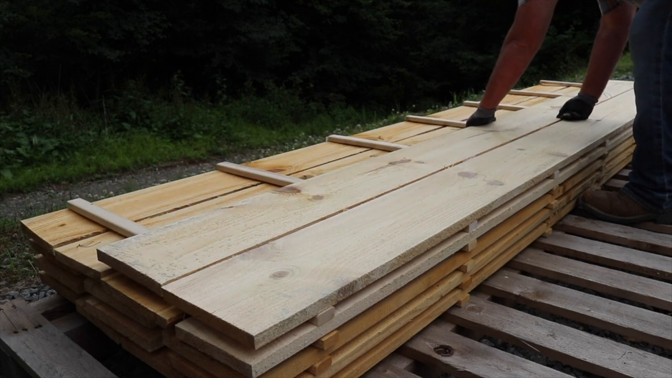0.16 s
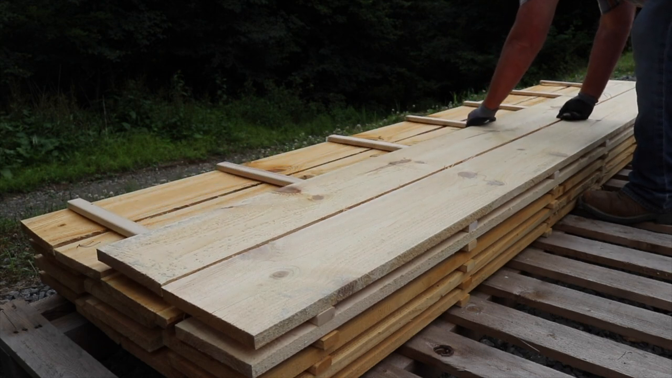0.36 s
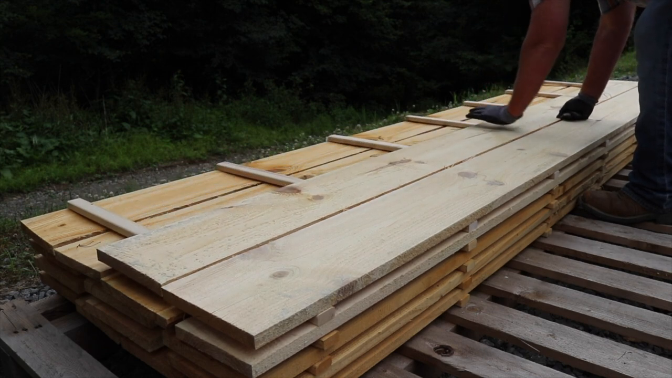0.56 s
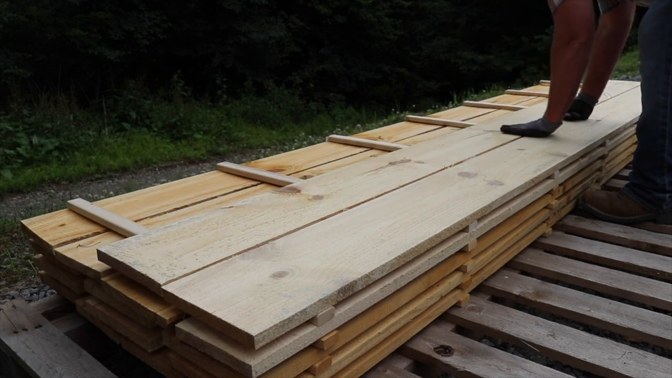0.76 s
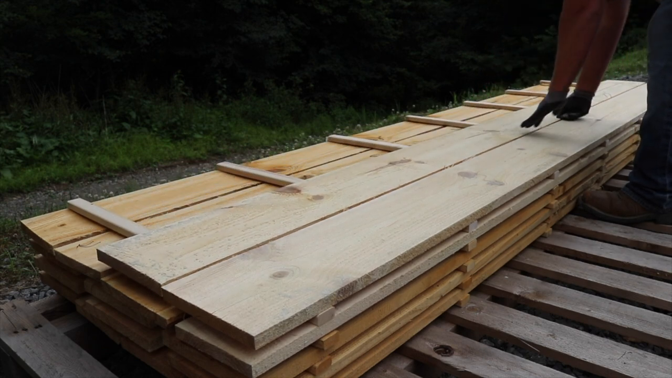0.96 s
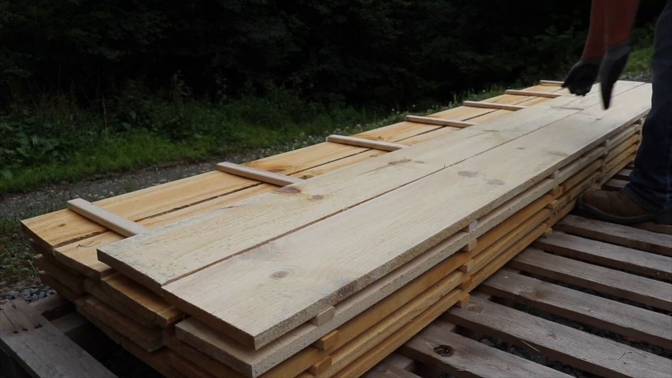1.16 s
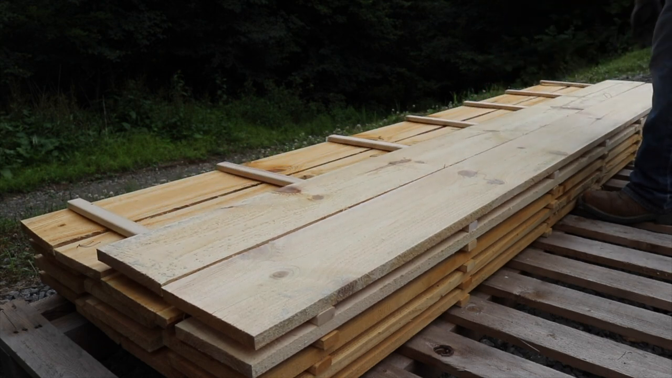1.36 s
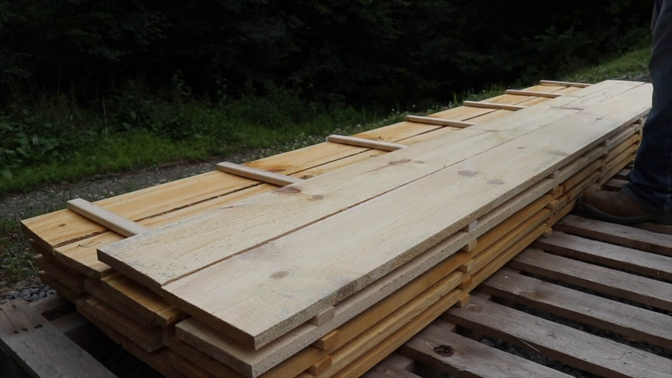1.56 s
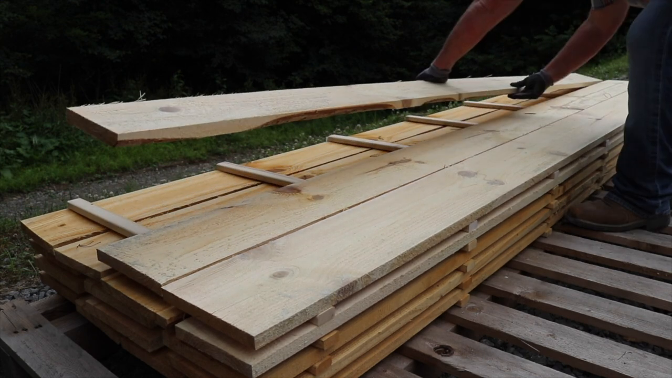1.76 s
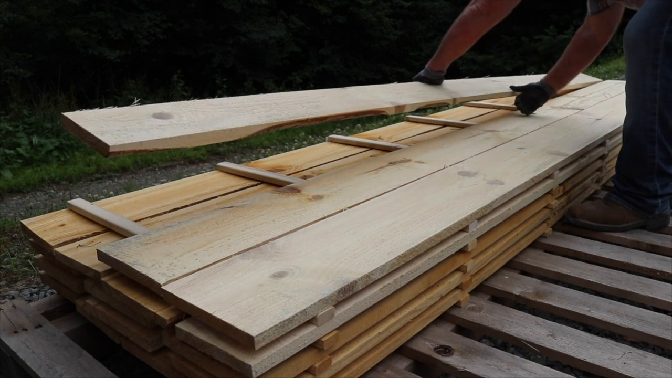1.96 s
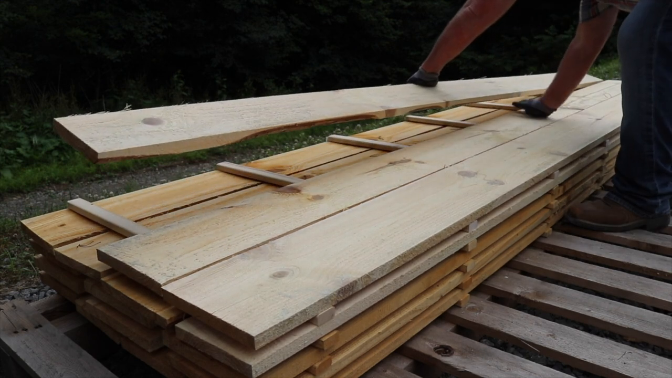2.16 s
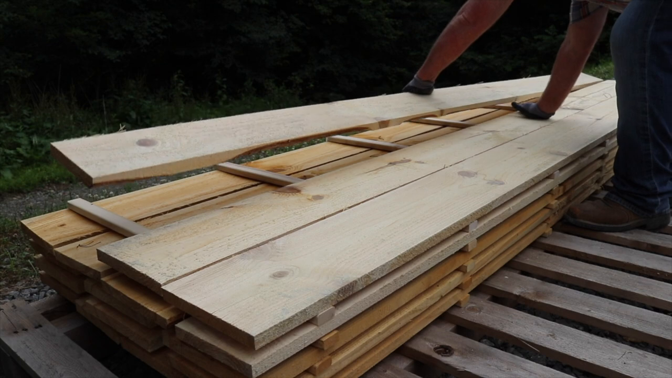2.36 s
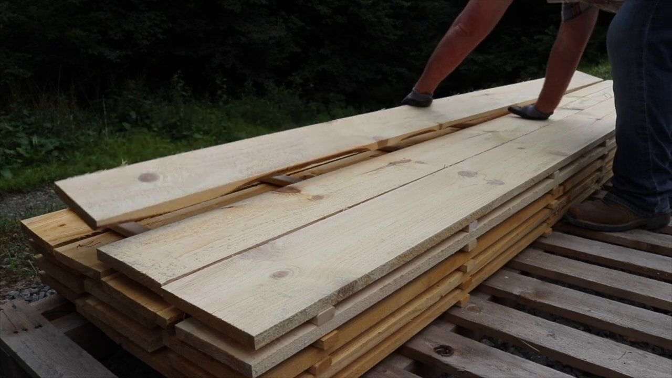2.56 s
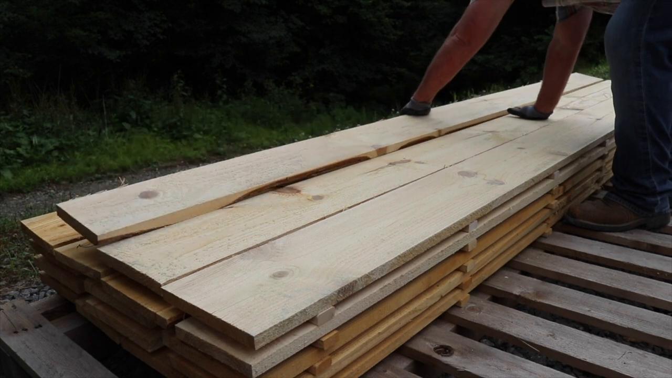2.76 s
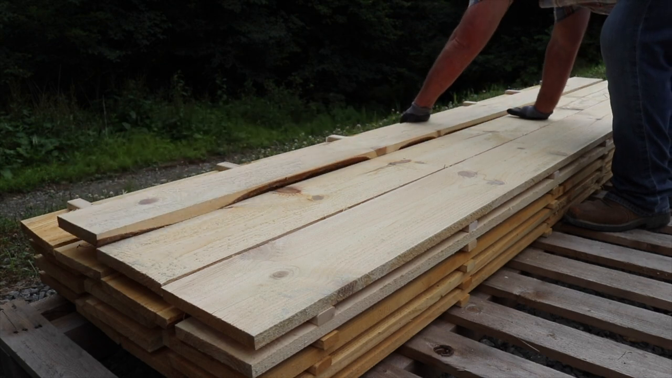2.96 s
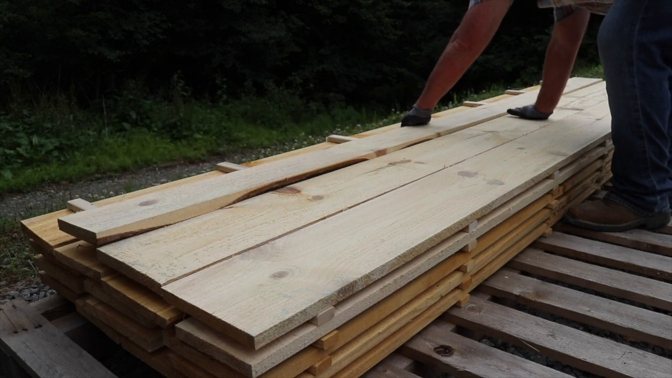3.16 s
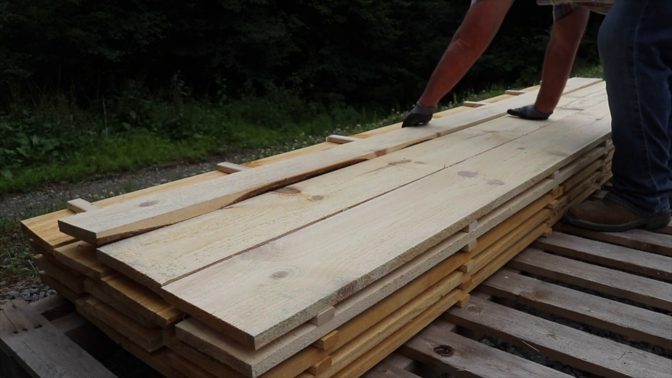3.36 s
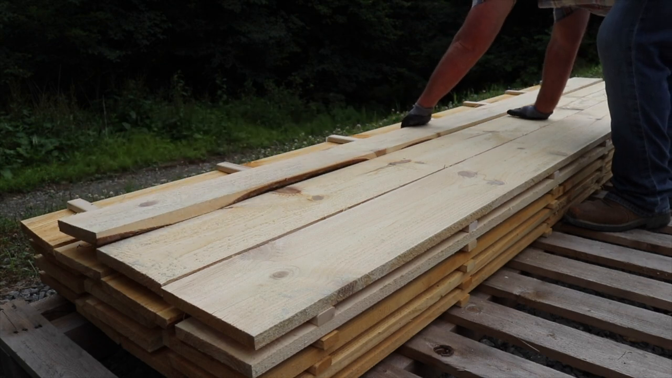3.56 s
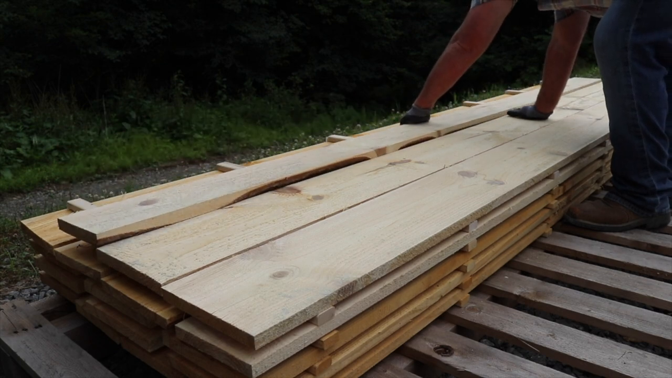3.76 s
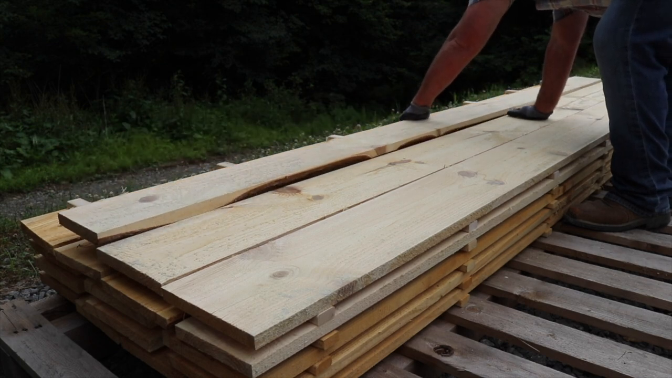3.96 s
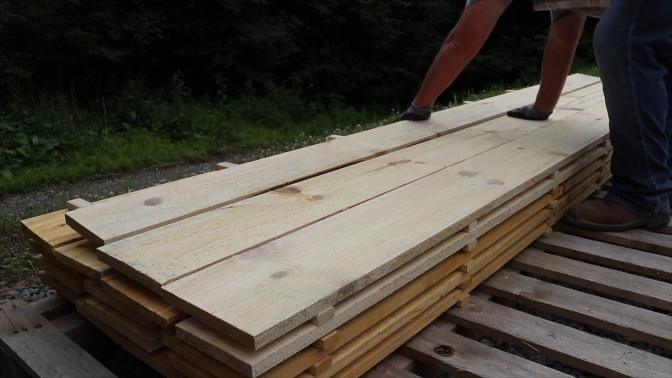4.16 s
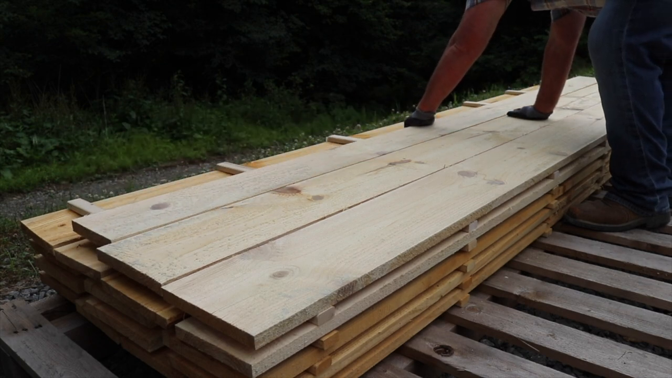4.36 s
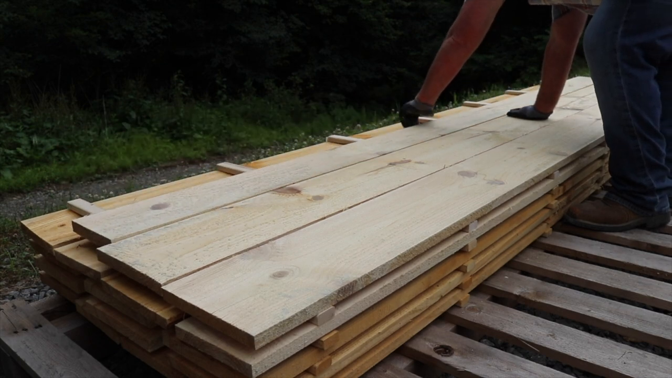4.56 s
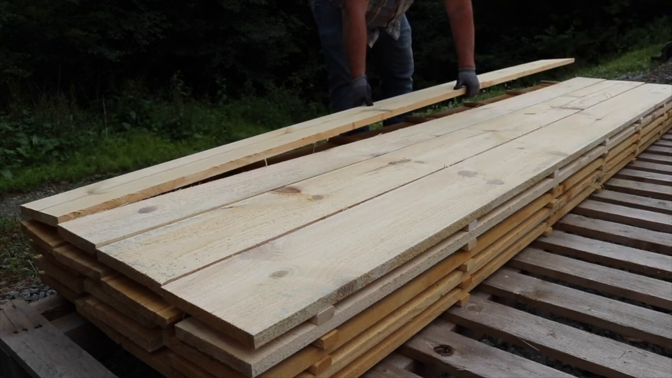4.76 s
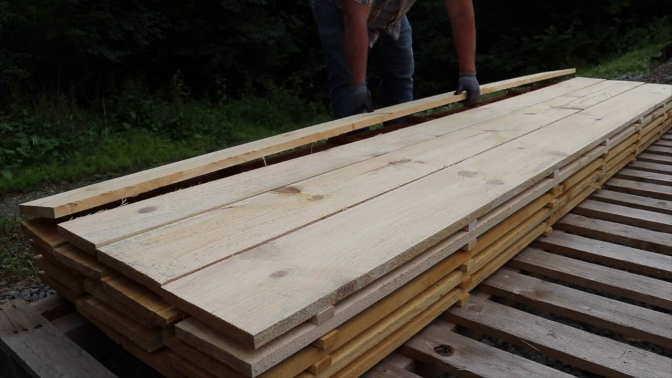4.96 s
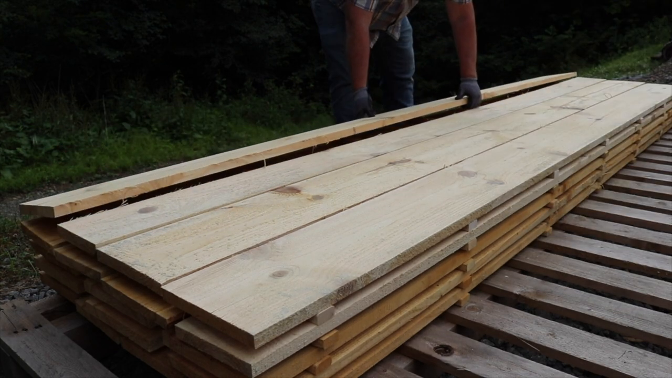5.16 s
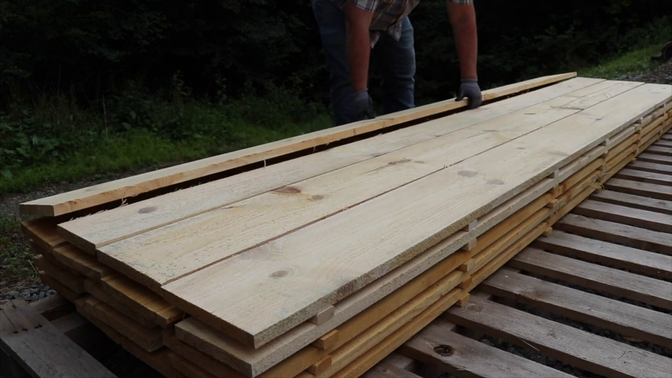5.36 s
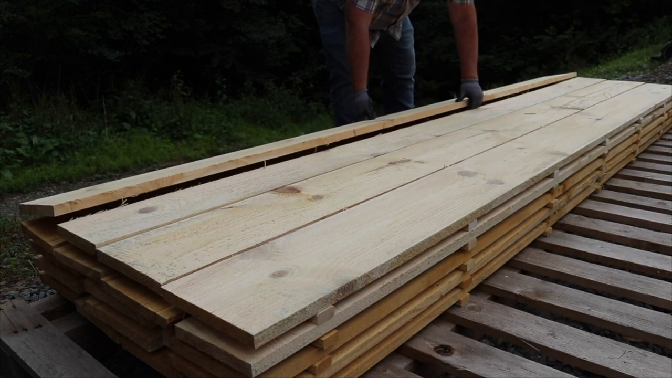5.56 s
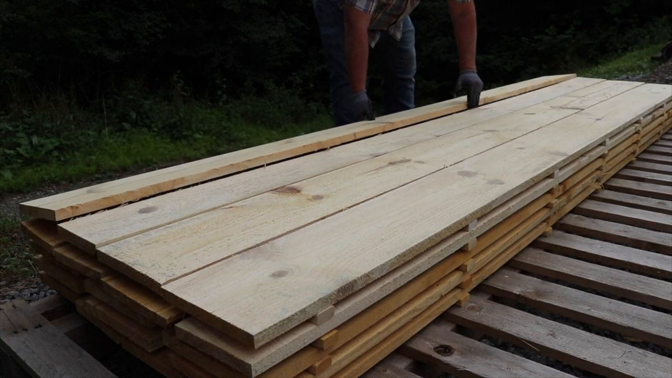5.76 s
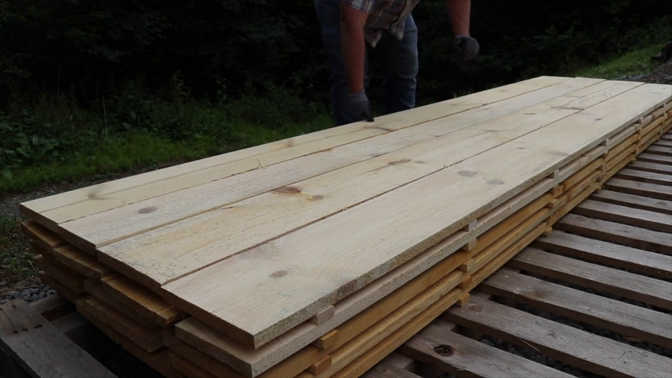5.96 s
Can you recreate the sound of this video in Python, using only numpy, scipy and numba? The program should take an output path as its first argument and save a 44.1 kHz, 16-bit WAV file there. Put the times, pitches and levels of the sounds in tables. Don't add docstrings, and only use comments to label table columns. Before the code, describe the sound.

Quiet wood handling in open air: brushing, sawdust sweeps and faint squeaks between irregular clicks of thin spacer strips. Boards knock with a hollow woody ring and a low boom from the pile, moderate past the middle, softer taps after. Near the end an edge touches, then a board falls flat with a sharp, clipped crack. Distant machines drone low behind soft leaf noise and camera hiss.

```python
import sys
import numpy as np
from scipy import signal
from scipy.fft import rfft, irfft
from scipy.io import wavfile
from scipy.ndimage import uniform_filter1d
from numba import njit

SR = 44100
rng = np.random.default_rng(int(sys.argv[2]) if len(sys.argv) > 2 else 0)


def wav_record(signal):
    frames = np.transpose(np.atleast_2d(signal))
    bounded = np.clip(frames, -1, 1)
    quanta = np.round(bounded * 32767).astype(np.int16)
    wavfile.write(sys.argv[1], SR, quanta)


def decibels_to_gain(level_db):
    exponent = np.asarray(level_db, float) / 20
    return 10 ** exponent


N = 265108
T = np.arange(N) / SR


def unit(x):
    return x / np.sqrt(np.mean(x ** 2))


def peak(x):
    return x / np.abs(x).max()


def curves(rows):
    s, *columns = np.transpose(rows)
    return [np.interp(T, s, c) for c in columns]


def over_log_hz(hz, points):
    table_hz, table_db = np.transpose(points)
    return np.interp(np.log(hz), np.log(table_hz), table_db)


def colour(points):
    hz = np.maximum(np.fft.rfftfreq(N, 1 / SR), 1)
    spectrum = rfft(rng.standard_normal(N)) * decibels_to_gain(over_log_hz(hz, points))
    return unit(irfft(spectrum, N))


def band(x, lo_hz, hi_hz, order=2):
    return unit(signal.sosfilt(signal.butter(order, [lo_hz, hi_hz], "band", fs=SR, output="sos"), x))


def walk(rate):
    k = int(SR / rate)
    steps = np.repeat(rng.standard_normal(N // k + 1), k)
    return 1.47 * uniform_filter1d(uniform_filter1d(steps, k), k)[:N]


@njit
def svf(x, hz, width):
    y, b, l = np.empty(len(x)), 0., 0.
    for i in range(len(x)):
        g, k = np.tan(np.pi * hz[i] / SR), width / hz[i]
        v = (b + g * (x[i] - l)) / (1 + g * (g + k))
        b, l, y[i] = 2 * v - b, l + 2 * g * v, k * v
    return y


def add(out, s, x):
    i = int(s * SR)
    out[i:i + len(x)] += x[:N - i]


# (frequency [Hz], t60 [s], level [dB])
PILE = [(173.3, 0.24, 1.5), (198.8, 0.17, 3), (237.3, 0.17, -0.5), (326, 0.066, 5), (362, 0.044, -1)]


def pile_boom(t):
    boom = sum(decibels_to_gain(db) * np.exp(-np.log(1000) * t / t60) * np.sin(2 * np.pi * hz * t) for hz, t60, db in PILE)
    return peak(boom * (1 - np.exp(-t / 0.0011)))


def knock(blows, modes, crowd_db, dense_db, t60_1k, crack_db, rise_ms, first):
    out, t = np.zeros(N), np.arange(int(.35 * SR)) / SR
    hz, width, db = np.transpose(modes)[:, :, None]
    width = np.maximum(width, .025 * hz)
    strong = decibels_to_gain(db) * width * np.exp(-np.pi * width * t) * np.sin(2 * np.pi * hz * t)
    crowd_hz = (180 * 2 ** ((np.arange(120) + rng.random(120)) / 21))[:, None]
    rate = np.log(1000) * (crowd_hz / 1000) ** 0.67 / t60_1k
    size = decibels_to_gain(over_log_hz(crowd_hz, crowd_db)) * np.sqrt(crowd_hz * rate)
    crowd = size * np.exp(-rate * t) * np.sin(2 * np.pi * crowd_hz * t)
    boom = pile_boom(t)
    for s, blow_db, contact_ms, rattle_ms, boom_db in blows:
        push = np.hanning(int(contact_ms * SR / 1000) + 2)[1:-1]
        rattle = rng.standard_normal(len(t)) * np.exp(-1000 * t / rattle_ms)
        rattle *= np.minimum(1000 * t / rise_ms, 1)
        rattle[int(rise_ms * SR / 1000)] += first
        strong_share = decibels_to_gain(2 * rng.standard_normal(len(strong)))
        crowd_share = np.tanh(2 * rng.standard_normal(len(crowd)))
        body = peak(strong_share @ strong) + decibels_to_gain(dense_db) * peak(crowd_share @ crowd)
        force = np.convolve(rattle, push)[:len(t)]
        y = peak(signal.fftconvolve(force, body)[:len(t)]) + decibels_to_gain(boom_db) * boom
        crack = peak(band(rattle * np.exp(-t / 0.0014), 2500, 9000))
        y += decibels_to_gain(crack_db) * (0.12 / contact_ms) * crack
        add(out, s + 0.000956, decibels_to_gain(blow_db) * y)
    return out


# blows (time [s], level [dB], contact [ms], rattle [ms], pile boom [dB]);
# strong modes (frequency [Hz], width [Hz], level [dB]); crowd of weak modes (frequency [Hz], level [dB per Hz])
SLAP_BLOWS = [(5.908, 11.5, 0.31, 3.4, -17), (5.9125, 3, 0.31, 2.3, -37), (5.916, 5, 0.3, 2.1, -26),
              (5.9215, 8.5, 0.56, 0.71, -31), (5.936, -20, 0.24, 2.5, -27), (5.95, -10.5, 1, 10, -17),
              (5.985, -19, 1, 17, 3)], [(716, 12, 3.5), (853, 19, -9), (985, 25, 5), (1152, 20, 7.5),
              (1440, 37, -4), (1650, 105, 7), (1923, 42, 9), (2220, 50, -5.5)], [(120, -45), (200, -12.5),
              (388, -12), (677, -7.5), (1260, -4), (1660, 1), (2440, -10.5), (8000, -47), (10400, -74),
              (17600, -120)]


def slap():
    return knock(*SLAP_BLOWS, dense_db=-1.3, t60_1k=0.056, crack_db=-50.5, rise_ms=0.24, first=12.0)


EDGE_BLOWS = [(5.769, -24, 0.97, 4.2, -23), (5.848, -8, 0.31, 1.2, -40)], [(376, 32, -1), (620, 53, -25),
              (1093, 77, 9), (1700, 110, 3), (2560, 230, 0.5)], [(120, -33), (200, -26), (617, 4.5),
              (908, -12), (1140, 10), (1560, 9), (8000, -27), (10400, -64), (17600, -120)]


def edge_landing():
    return knock(*EDGE_BLOWS, dense_db=-5.5, t60_1k=0.068, crack_db=-25, rise_ms=2.43, first=12.0)


SEAT_BLOWS = [(4.208, -11.5, 0.23, 4.2, -9.5), (4.217, -11, 0.24, 2.2, -11.5),
              (4.231, -17.5, 0.22, 2.1, -6.5), (4.246, -33, 1, 1.3, 0), (4.261, -36.5, 0.72, 3.2, 13.5),
              (4.36, -39, 0.48, 4.1, 6.5), (4.377, -26.5, 0.61, 1.7, 4)], [(640, 74, 0), (890, 55, 1),
              (1130, 48, -4), (1430, 120, -31), (2050, 120, -26), (2750, 250, -32), (3500, 300, -30),
              (4360, 300, -33)], [(120, -33), (200, -5.5), (929, -2), (1060, -9), (1200, -10),
              (1600, -19.5), (2580, -43), (3600, -28.5), (4600, -28), (6500, -74), (11000, -120)]


def seating():
    return knock(*SEAT_BLOWS, dense_db=1.3, t60_1k=0.059, crack_db=-28, rise_ms=1.967, first=7.3)


TAP_BLOWS = [(5.101, -26.5, 0.098, 3.5, -24), (5.104, -14, 0.1, 2.4, -22), (5.125, -38, 0.36, 3.4, 8),
             (5.16, -44.5, 0.29, 3, 15.5)], [(374, 39, 7), (1187, 90, 7.5), (1750, 130, -3.5),
             (2490, 110, -7.5), (3330, 200, -12)], [(120, -35), (200, -22), (617, 7), (908, -10),
             (1140, -2), (1700, -7), (8000, -27), (12000, -48)]


def tap():
    return knock(*TAP_BLOWS, dense_db=-3, t60_1k=0.07, crack_db=-15.5, rise_ms=2.21, first=13.0)


DROP_BLOWS = [(2.714, -29, 0.09, 2.5, -18), (2.7178, -19, 0.75, 3.9, 2), (2.7205, -29, .12, 7, -17),
              (2.732, -38, .2, 5, -10), (2.739, -33.5, 0.4, 3.7, 10), (2.755, -44, .2, 12, -10),
              (2.779, -49, 0.15, 5.8, 4)], [(654, 32, 28), (780, 31, 16), (1200, 130, 6.1), (1610, 40, 16),
              (1880, 45, 7), (2100, 50, 6), (2340, 55, 5), (2580, 60, 4)], [(120, -19), (200, 5.5),
              (520, -8), (801, -8), (1030, -23), (1700, -13), (5000, -37), (6500, -85), (11000, -120)]


def drop_landing():
    return knock(*DROP_BLOWS, dense_db=2.0, t60_1k=0.098, crack_db=-14, rise_ms=0.6, first=4.7)


LIFT_BLOWS = [(1.562, -36.5, 0.18, 19, -1), (1.671, -23, 0.62, 7.2, -16.5), (1.682, -26.5, 0.16, 10, -3),
              (1.724, -35.5, 0.31, 3.7, 6.5), (1.754, -45, 0.2, 3.8, -7)], [(468, 26, 1.5), (1570, 26, -14),
              (1780, 37, -20)], [(120, -44), (200, -28.5), (461, 2), (587, -12), (1570, -22), (5000, -43),
              (6500, -75), (11000, -120)]


def lifting():
    return knock(*LIFT_BLOWS, dense_db=1.24, t60_1k=0.034, crack_db=-10, rise_ms=0.72, first=6.7)


def contact_gains(base_db, bright_db):
    flat = 0 * bright_db
    return decibels_to_gain(np.array([flat, base_db[0] + flat, base_db[1] + bright_db, base_db[2] + 0.66 * bright_db]))


def swells(rows, base_db):
    out = np.zeros((4, N))
    for s, db, swell, fade, bright_db in rows:
        away = np.where(T < s, np.abs((s - T) / swell) ** 1.7, np.abs((T - s) / fade) ** 2.4)
        out += contact_gains(base_db, bright_db)[:, None] * decibels_to_gain(db - 20 * away)
    return out


# (peak time [s], level [dB], swell over 20 dB [s], fade over 20 dB [s], brightness [dB])
SHOVES = [(.35, -50.5, 0.04, 0.12, -16), (.452, -39.5, 0.082, 0.033, 2.5), (1.57, -58, 0.059, 0.011, 16),
          (3.89, -45.5, 0.0094, 0.024, -27), (4.305, -46, 0.019, 0.037, 1), (4.335, -50, 0.033, 0.04, -2),
          (4.37, -45.5, 0.066, 0.03, -9), (4.48, -56, 0.037, 0.074, -18),
          (4.555, -37.5, 0.046, 0.026, -3.5), (4.582, -37, 0.024, 0.029, 4),
          (4.825, -50.5, 0.022, 0.076, -18), (5.25, -62, 0.08, 0.067, -20), (5.724, -50, 0.014, 0.016, 0),
          (5.745, -52, 0.024, 0.041, 4), (5.768, -35.5, 0.055, 0.03, -13), (5.85, -34.5, 0.037, 0.061, 1),
          (5.99, -37.5, .05, .05, -11)]
# (rumble [dB], grit [dB], dust [dB])
SHOVE_DB = (-11, -13.5, -24.5)


def shoves():
    return swells(SHOVES, SHOVE_DB)


SWEEPS = [(.803, -43, 0.0045, 0.045, 1), (.836, -40.5, 0.038, 0.031, 3), (.858, -51, 0.02, 0.031, -9),
          (1.6, -63, 0.013, 0.02, 18), (4.08, -69, 0.021, 0.0076, 23), (5.725, -34.5, 0.0072, 0.0035, 11),
          (5.866, -31.5, .03, 0.014, -9), (5.855, -42, .004, .005, 14), (5.13, -58, .015, .03, 15),
          (5.882, -44, .03, 0.01, 11), (5.907, -46, 0.01, 0.0044, -6), (5.897, -55, 0.022, .015, -9)]
# (rumble [dB], grit [dB], dust [dB])
SWEEP_DB = (-10, -19, -14)


def sweeps():
    return swells(SWEEPS, SWEEP_DB)


BRUSHES = [(.98, -54, 0.052, 0.053, 12.5), (1.098, -40.5, 0.022, 0.021, -20),
           (1.125, -45, 0.02, 0.027, -16), (2.06, -56, 0.021, 0.019, 1), (2.175, -75, 0.019, 0.022, 22),
           (2.765, -48, .02, 0.014, -4), (2.89, -64, 0.04, 0.32, 0), (3.11, -56.5, 0.21, 0.11, 3),
           (3.23, -56.5, .04, 0.23, 6), (3.31, -62, 0.051, 0.011, -3), (3.53, -54.5, 0.038, 0.076, -3),
           (3.69, -55, 0.093, 0.12, -9), (3.97, -56, 0.029, 0.32, 3), (4.06, -56.5, 0.21, 0.041, 3),
           (4.16, -58, 0.099, 0.32, -8), (5.64, -60.5, 0.063, 0.2, 18)]
# (rumble [dB], grit [dB], dust [dB])
BRUSH_DB = (-27, -18, -27)


def brushes():
    return swells(BRUSHES, BRUSH_DB)


# (time [s], pressure [dB], brightness [dB])
RUB = [(0, -59.5, -19), (.3, -58, -26), (.5, -59, -9), (.72, -58.5, -4), (1.2, -57.5, 5), (1.8, -55, 3),
       (1.84, -63, 16.5), (2.3, -60, 11), (2.42, -64.5, 8), (2.7, -67, 17), (2.76, -60, 7),
       (3.35, -74.5, 5), (3.47, -67, 9), (3.56, -67.5, 8), (4.45, -56.5, 6), (4.66, -66.5, 13),
       (5.0, -62, 11), (5.7, -63, -7)]
# (rumble [dB], grit [dB], dust [dB])
RUB_DB = (5, -16, -20)


def creeping():
    db, bright_db = curves(RUB)
    return decibels_to_gain(db) * contact_gains(RUB_DB, bright_db)


# (frequency [Hz], width [Hz], level [dB])
RASP = [(970, 18, 15), (1250, 120, 7.5), (1700, 11, 8), (2050, 8.9, 10)]


def drag():
    press, low, grit, dust = creeping() + shoves() + brushes() + sweeps()
    grains = rng.standard_normal(N) * decibels_to_gain(2.6 * np.minimum(rng.exponential(size=N), 5))
    grains *= decibels_to_gain(1.5 * walk(120))
    rings = sum(decibels_to_gain(db) * svf(grains, np.full(N, 1. * hz), 1. * width) for hz, width, db in RASP)
    humming = uniform_filter1d(1. * ((T > 3.95) & (T < 4.2)), size=1500)
    body = band(grains, 594, 2180, order=3) * (1 - .5 * humming)
    body += decibels_to_gain(-0.5) * humming * unit(rings)
    rumble = decibels_to_gain(2.0 * walk(40)) * band(rng.standard_normal(N), 212, 1430)
    grit_noise = band(grains, 2200, 4500, order=3)
    smeared = signal.lfilter([1], [1, -0.5], grains)
    dust_noise = band(smeared, 4000, 16000)
    return press * body + low * rumble - grit * grit_noise + dust * dust_noise


def wandering_bands(tracks, width):
    out, air = np.zeros(N), rng.standard_normal(N)
    wobble = 1 + width / 15000 * walk(25)
    for rows in tracks:
        hz, db = curves(rows)
        on = uniform_filter1d(1. * ((T > rows[0][0]) & (T < rows[-1][0])), size=600)
        flutter = decibels_to_gain(2 * walk(45))
        narrow = svf(svf(air, hz * wobble, 1. * width), hz * wobble, 1.3 * width)
        out += on * decibels_to_gain(db) * flutter * unit(narrow)
    return out


# (time [s], frequency [Hz], level [dB])
AIR_GAPS = [
    [(1.82, 3130, -63), (1.88, 3170, -66), (1.95, 3070, -76)],
    [(4.86, 2560, -70), (4.95, 2950, -62), (5.05, 3520, -68)],
    [(1.088, 2230, -52), (1.105, 2220, -60), (1.113, 2250, -60), (1.125, 2190, -43), (1.138, 2250, -58)],
    [(1.95, 4260, -72), (2.05, 3620, -67), (2.2, 4130, -71)],
    [(3.97, 3500, -72), (4.03, 3970, -57), (4.09, 4400, -74)],
    [(1.33, 2700, -66), (1.38, 3240, -58), (1.42, 3500, -64)],
    [(.24, 5100, -71), (.3, 5300, -72), (.36, 5000, -70)],
    [(.52, 3500, -72), (.6, 3560, -64), (.72, 3500, -70)],
    [(.39, 1600, -51), (.44, 2000, -36), (.465, 2300, -51)],
    [(4.53, 2000, -52), (4.56, 2200, -45), (4.585, 3300, -38), (4.6, 3400, -50)],
]


def air_gaps():
    return wandering_bands(AIR_GAPS, 600)


# (time [s], frequency [Hz], level [dB])
SQUEAKS = [
    [(.49, 3000, -58), (.52, 3150, -59), (.56, 3200, -67)],
    [(.49, 2500, -63), (.53, 2500, -66)],
    [(.56, 3800, -61), (.59, 3150, -61), (.61, 2750, -58), (.635, 2730, -60), (.7, 2900, -72)],
    [(2.75, 2300, -58), (2.77, 2700, -61), (2.79, 3400, -61), (2.815, 2800, -58), (2.825, 2610, -51),
     (2.84, 2400, -62), (2.89, 2960, -70)],
    [(3.53, 2400, -62), (3.56, 2350, -57), (3.6, 2420, -55), (3.64, 2350, -60), (3.68, 2670, -57),
     (3.75, 2770, -60.5), (3.8, 2700, -55)],
    [(3.66, 2900, -68), (3.72, 3000, -65), (3.78, 3160, -65), (3.86, 3100, -66)],
    [(4.225, 2120, -46), (4.24, 2240, -44), (4.26, 2050, -51), (4.29, 2100, -50)],
    [(4.86, 2800, -68), (4.9, 2800, -61), (4.93, 2580, -59), (4.96, 2700, -64)],
    [(5.37, 1750, -72), (5.43, 1950, -54), (5.47, 2050, -65), (5.51, 2050, -62), (5.56, 2000, -62),
     (5.63, 2050, -56)],
    [(5.53, 3300, -71), (5.57, 3250, -65), (5.63, 3250, -72)],
    [(5.66, 2550, -52), (5.68, 2480, -55), (5.71, 2390, -51)],
]


def squeaks():
    return wandering_bands(SQUEAKS, 260)


# (multiple of its pitch, level [dB])
STRIP = [(.47, 1), (.75, 5), (1.001, 14.5), (1.09, 4), (1.82, -8)]


def snaps(rows, click_hz):
    out, t = np.zeros(N), np.arange(int(.06 * SR)) / SR
    for s, db, hz, t60, click_db in rows:
        fade = np.exp(-np.log(1000) * t / t60) * np.minimum(t / 0.0026, 1)
        tone = peak(sum(decibels_to_gain(d) * np.sin(2 * np.pi * k * hz * t) for k, d in STRIP))
        click = band(rng.standard_normal(len(t)), *click_hz, order=3)
        add(out, s, decibels_to_gain(db) * fade * (3.8 * tone + decibels_to_gain(click_db) * click))
    return out


# (time [s], level [dB], pitch [Hz], t60 [s], click [dB])
TICKS = [(1.56, -41, 1200, 0.015, -7), (1.566, -46, 1220, 0.021, 6.5), (2.053, -44, 1600, 0.036, -4),
         (1.0905, -39, 2250, 0.033, 3), (2.066, -46, 1500, .03, -3), (2.06, -47, 2320, .03, -5),
         (2.088, -43, 3800, 0.014, 6), (2.232, -38, 1530, 0.025, 0), (2.2408, -43, 2400, 0.014, 15),
         (2.2876, -27.5, 1990, 0.015, -13), (2.298, -44, 1700, 0.02, 0), (2.3555, -38, 1380, 0.015, 1),
         (2.552, -44, 1340, 0.011, -5), (2.18, -48, 1900, .03, 6), (2.9635, -28, 1865, 0.019, -12.5),
         (3.212, -45, 1390, 0.02, -16), (3.312, -39.5, 1310, 0.017, -23), (3.502, -29.5, 1926, 0.025, -10),
         (3.503, -33, 1660, 0.02, -11), (3.662, -45, 1380, 0.02, -11), (3.881, -38, 980, 0.018, -4.5),
         (3.894, -38, 1960, 0.016, -28), (4.366, -45, 2980, 0.014, 6), (4.4273, -40, 3200, 0.014, 6),
         (4.4488, -55, 1200, .015, 6), (4.7, -36, 1840, 0.013, -23), (4.816, -46.5, 1570, 0.059, 1),
         (5.059, -49, 2050, 0.02, -15), (5.233, -47, 1940, 0.02, -17)]


def strip_ticks():
    return snaps(TICKS, (420, 2900))


# (time [s], level [dB], pitch [Hz], t60 [s], click [dB])
GRIT_CRACKS = [(1.5645, -37.5, 3000, 0.011, 6), (1.5655, -30.5, 5700, 0.011, 1),
               (5.721, -32, 2060, 0.026, -5.5), (5.722, -35, 5010, 0.02, -18),
               (5.848, -20, 2880, 0.012, -20), (5.852, -43, 8300, 0.028, 0), (5.853, -39, 10200, 0.018, 2)]


def grit_cracks():
    return snaps(GRIT_CRACKS, (1500, 15500))


# (time [s], frequency [Hz], level [dB])
DRONES = [
    [(0, 117, -39), (.2, 110.5, -37.5), (1.0, 104, -44.5), (1.55, 114.8, -45), (1.8, 103.4, -52.5),
     (2.8, 114, -54), (3.25, 112.3, -41.5), (3.45, 111.7, -50.5), (6.01, 103.3, -63)],
    [(0, 116, -85), (1.75, 130.7, -46.5), (1.9, 129, -39.5), (2.1, 122.8, -53), (3.3, 126.5, -49),
     (4.0, 122.2, -50), (4.4, 132, -50), (4.7, 132.4, -54), (6.01, 131, -53.5)],
]


def drones():
    out = np.zeros(N)
    for rows in DRONES:
        hz, db = curves(rows)
        out += decibels_to_gain(db) * unit(svf(svf(rng.standard_normal(N), hz, 7.7), hz, 25.0))
    return out


# (frequency [Hz], level [dB per Hz])
WOODS = [(13, -50), (22, -10), (65, 2.5), (125, -2), (146, 0.5), (228, -10), (325, -18.5), (497, -18.5),
         (568, -25), (1010, -18.5), (1480, -25), (4500, -46.5), (5850, -100), (9900, -120)]


def woods():
    return decibels_to_gain(-46 + .5 * walk(2.42)) * colour(WOODS)


def scene():
    boards = slap() + edge_landing() + seating() + tap() + drop_landing() + lifting()
    boards = signal.sosfilt(signal.butter(3, 120, "high", fs=SR, output="sos"), boards)
    friction = drag() + air_gaps() + squeaks()
    small = strip_ticks() + grit_cracks()
    return np.tile(boards + friction + small + drones() + woods(), (2, 1))


# (frequency [Hz], level [dB per Hz])
HISS = [(1500, -9.5), (2500, -8), (3500, -7), (5000, -5.5), (9000, -5.5), (12000, -5.5), (15800, -6.5)]


def microphone_hiss():
    return decibels_to_gain(-59) * np.array([colour(HISS), colour(HISS)])


@njit
def follow(x, attack, release):
    y, e = np.empty(len(x)), 0.
    for i in range(len(x)):
        e += (x[i] - e) * (attack if x[i] > e else release)
        y[i] = e
    return y


def gain_control(x):
    top, attack_s, release_s, squeeze = 0.17, 0.0099, 2.2, 0.92
    e = follow(np.abs(x).mean(axis=0), 1 / (attack_s * SR), 1 / (release_s * SR))
    return x * (top / np.maximum(e, top)) ** squeeze


def roll_off(x):
    return signal.sosfilt(signal.butter(12, 15900, fs=SR, output="sos"), x)


def record(dry):
    capsule_gain = decibels_to_gain(np.array([[.05], [-.05]]))
    x = signal.sosfilt(signal.butter(2, 35, "high", fs=SR, output="sos"), dry) * capsule_gain
    x = x + microphone_hiss()
    x = np.clip(gain_control(x), -1, 1)
    x = signal.sosfiltfilt(signal.ellip(8, .1, 50, 15850, fs=SR, output="sos"), x)
    return roll_off(x)


dry = scene()
out = record(dry)
wav_record(out)
```